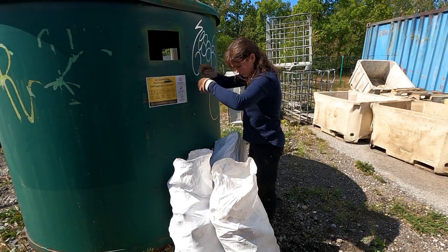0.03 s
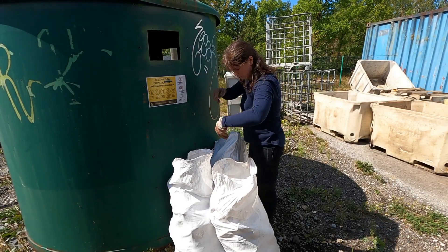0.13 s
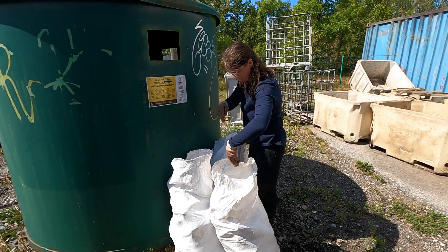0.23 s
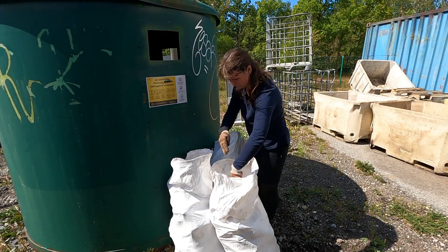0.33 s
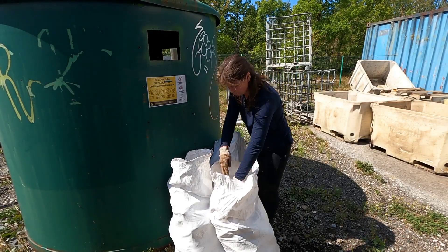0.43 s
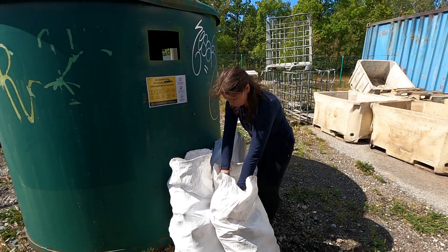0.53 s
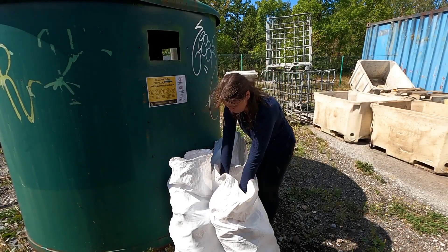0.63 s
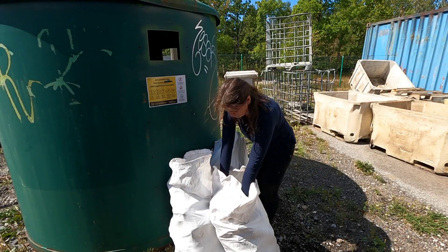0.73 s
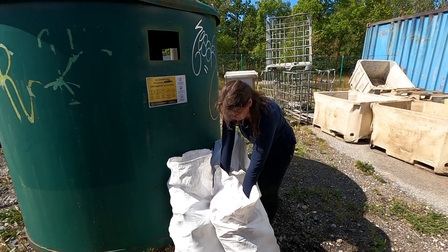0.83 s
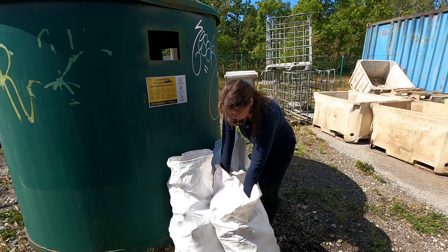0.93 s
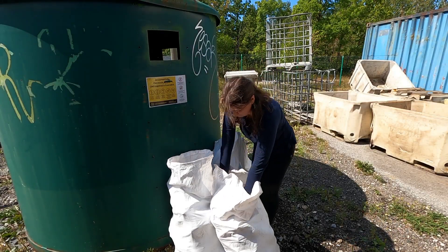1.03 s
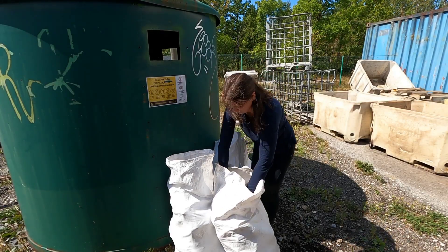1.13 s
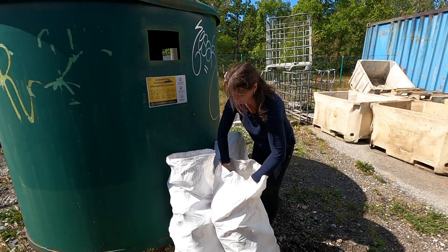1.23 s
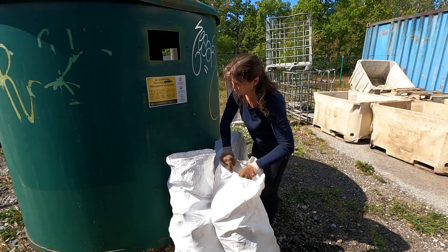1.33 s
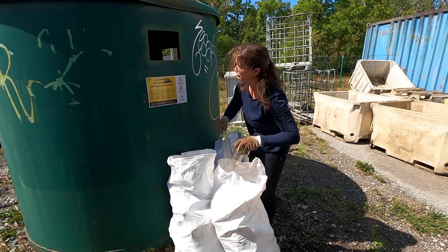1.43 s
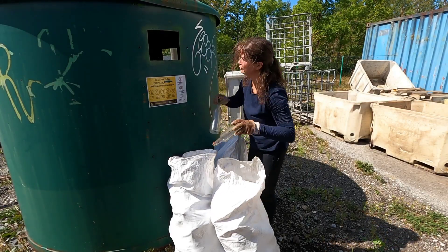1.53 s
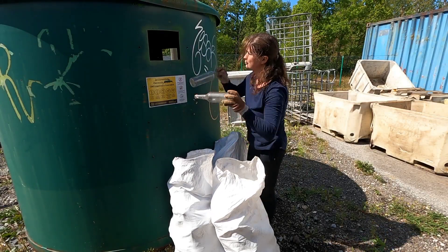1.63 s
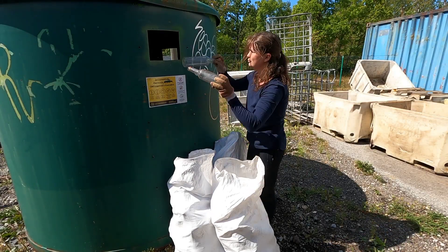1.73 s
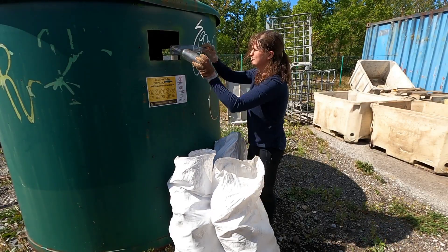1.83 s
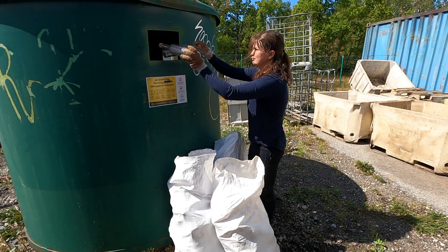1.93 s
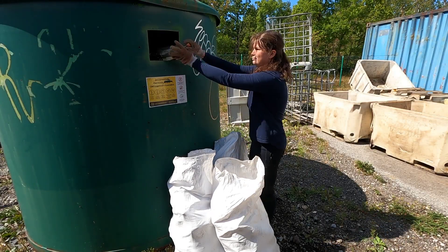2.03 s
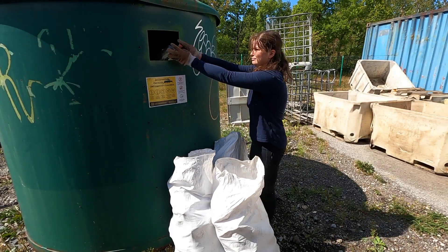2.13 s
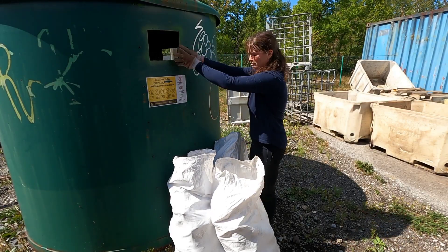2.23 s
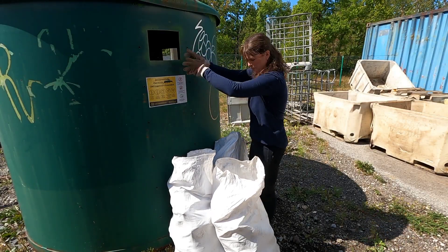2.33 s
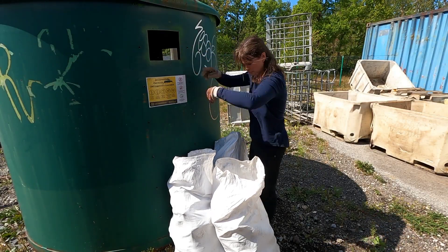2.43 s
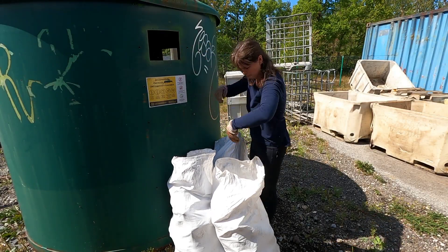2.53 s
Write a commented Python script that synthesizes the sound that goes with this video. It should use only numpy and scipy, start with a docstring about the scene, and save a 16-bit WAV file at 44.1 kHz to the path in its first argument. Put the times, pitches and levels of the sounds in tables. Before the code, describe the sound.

A glass piece shatters on a heap in a booming container, then bottles scrape, clink and bounce

```python
"""Waste glass goes into a big hollow recycling bank, outdoors in a light breeze (filtered noise).
First a piece smashes on the heap with a low knock (a push and a noise burst): shards tumble in waves
(randomly struck resonators and grains), larger pieces ring (decaying sines with jostling noise) and the
shell booms (decaying low noise). Then bottles scrape and clink in the hands (noise chirps, beating modes,
a diffuse echo), drop in and bounce without breaking; faint steps on gravel tick (pushes and bursts)."""
import sys
import numpy as np
from scipy import signal
from scipy.fft import rfft, irfft
from scipy.io import wavfile

SR = 44100
rng = np.random.default_rng(int(sys.argv[2]) if len(sys.argv) > 2 else 0)


def unload_audio(sound):
    """Save the sound as a 16-bit wav file, at the path given as the first command line argument."""
    columns = np.transpose(np.atleast_2d(sound))
    # keep every value between -1 and 1, then stretch to whole-number steps
    steps = np.round(np.clip(columns, -1, 1) * 32767)
    wavfile.write(sys.argv[1], SR, steps.astype(np.int16))


N = 112455
T = np.arange(int(1.2 * SR)) / SR  # time within one event, s
HZ = np.fft.rfftfreq(len(T), 1 / SR)

# spectrum of breaking and touching glass: f/Hz, level/dB
GLASS_TONE = [(300, -39), (900, 4), (1400, 0), (2000, -0.5), (2350, -2.5), (3600, 0), (5600, -5),
              (6800, -2), (8200, -8), (9600, -11), (10800, -17.5), (12200, -17.5), (16000, -44)]


def amp(db):
    """Level to amplitude: 20 dB is a factor of ten."""
    return 10 ** (np.asarray(db) / 20)


def evened(x):
    """Normalization of power: scales to rms 1."""
    return x / np.sqrt(np.mean(x ** 2) + 1e-20)


def read(points, hz):
    """Pitch is logarithmic in frequency: interpolates a table on that axis."""
    f, value = np.transpose(points)
    return np.interp(np.log(hz + 1), np.log(f + 1), value)


def fade(t60):
    """Exponential decay: linear damping loses 60 dB in every t60 seconds."""
    return np.exp(-np.log(1000) * T / t60)


def add(mix, s, sound):
    """Superposition: adds a stereo sound at time s, cut at the ends of the scene."""
    at = round(s * SR)
    sound = sound[:, max(-at, 0):]
    part = mix[:, max(at, 0):][:, :sound.shape[1]]
    part += sound[:, :part.shape[1]]


def paired(x, db):
    """Interchannel coherence: colours two unrelated signals and makes them partly alike."""
    # likeness of left and right: f/Hz, coherence/1
    coherence = [(30, 0.63), (100, 1), (500, 0.99), (1000, 0.76), (2000, 0.54), (4000, 0.74)]
    hz = np.fft.rfftfreq(x.shape[1], 1 / SR)
    same = np.clip(read(coherence, hz), -1, 1)
    left, other = rfft(x)
    right = same * left + np.sqrt(1 - same ** 2) * other
    return evened(irfft(np.array([left, right]) * amp(db), x.shape[1]))


def hiss(db, size=len(T)):
    """Spectral shaping: stereo Gaussian noise filtered to a given spectrum, rms 1."""
    return paired(rng.standard_normal((2, size)), db)


def dying(db, t60s):
    """Frequency-dependent damping: stereo noise whose bands each decay at their own rate."""
    hz, t, bands = signal.stft(hiss(db), SR, nperseg=512)
    decay = amp(-60 * t / read(t60s, hz)[:, None])
    return signal.istft(bands * decay, SR, nperseg=512)[1][:, :len(T)]


def ring(hz, t60):
    """Lifted degeneracy: glass is never quite round, so a mode beats with a weaker twin."""
    twin, split_hz = 0.42, 30  # relative amplitude, largest split
    ear_phase = 0.22 * rng.uniform(-2.8, 1) * np.array([[1], [-1]])  # rad, opposite at the two microphones
    phase = 2 * np.pi * hz * T + ear_phase
    offset_hz = split_hz * rng.uniform(0.86, 1) * rng.choice([-1, 1])
    twin_phase = phase + 2 * np.pi * (offset_hz * T + rng.random())
    onset = 1 - np.exp(-(T / 0.00096) ** 2)
    return np.sqrt(2) * (np.sin(phase) + twin * np.sin(twin_phase)) * fade(t60) * onset


def echo(x):
    """Diffuse reverberation: convolution with dense decaying reflections inside the bank."""
    # decay of the reflections: f/Hz, t60/s
    echo_t60 = [(2500, 0.46), (5000, 0.43), (12000, 0.21)]
    tail = dying(0 * HZ, echo_t60)
    return signal.fftconvolve(x, tail / np.linalg.norm(tail[0]), axes=1)[:, :len(T)]


def burst(db, hz, t60, width=0.061, slope_db=25):
    """Heavy damping broadens a resonance: noise around one pitch (width in octaves, slope in dB/octave)."""
    contact_s = 0.001
    shape = fade(t60) * (1 - np.exp(-(T / contact_s) ** 2))  # the contact builds up smoothly
    distance = np.hypot(np.log2((HZ + 20) / hz), width)
    rattle = hiss(-slope_db * distance) * shape
    return amp(db) * evened(rattle) * np.sqrt(np.mean(shape ** 2))


def tumble(db, rise, t60, treble_db):
    """Random impact excitation: shards chatter at their own pitches over a crunch of tiny fractures."""
    # pitches of the broken glass lying in the heap: f/Hz
    heap = [2270, 2476, 2573, 2842, 2920, 3101, 3246, 3413, 3810, 4010, 4290, 4420, 4560, 4690, 4845, 5378,
            5510, 5787, 6060, 6412, 7260, 7612, 7865, 8231, 9450, 11900, 12400]
    detune, shard_t60, hits_per_s = .022, 0.11, 55  # fraction of pitch, s, rate for each shard
    crunch_db, size_db, grains_per_s = 0.5, 3.5, 3500
    size = 32768
    t, hz = T[:size], np.fft.rfftfreq(size, 1 / SR)
    radius = np.exp(-np.log(1000) / (shard_t60 * SR))  # pole radius that gives the decay
    tinkle = np.zeros((2, size))
    for pitch in np.repeat(heap, 2) * (1 + detune * rng.uniform(-1.04, 1, 2 * len(heap))):
        hits = (rng.random(size) < hits_per_s / SR) * 1.
        hits[0] = 2
        hits *= rng.standard_normal(size)
        turn = 2 * np.pi * pitch / SR
        poles = [1, -2 * radius * np.cos(turn), radius * radius]
        shard = evened(signal.lfilter([1, 0, -1], poles, hits))
        tinkle += rng.standard_normal((2, 1)) * shard  # random weight and sign in each channel
    grain_size = amp(size_db * np.minimum(rng.exponential(1, size), 4))
    grains = grain_size * (rng.random(size) < grains_per_s / SR) * rng.standard_normal((2, size))
    tone = read(GLASS_TONE, hz) + treble_db * np.log2(np.clip(hz, 1500, 9000) / 4000)
    glass = paired(evened(tinkle) + amp(crunch_db) * evened(grains), tone)
    return amp(db) * glass * np.minimum(t / rise, 1) * fade(t60)[:size]


def piece(hz, db, t60, width_hz=50):
    """Modal ringing: a large piece sounds its mode, with noise around it as neighbours jostle it."""
    rattle = .6
    jostle = hiss(-20 * np.log10(1 + ((HZ - hz) / width_hz) ** 2))
    return amp(db) * np.minimum(T / 0.0014, 1) * (ring(hz, t60) + rattle * jostle * fade(t60))


def boom(db, bass_db, rise, bass_hz=450):
    """High modal density: the shell and its air ring in a crowd of low modes."""
    # spectrum of the boom: f/Hz, level/dB
    boom_tone = [(40, -37), (70, -10), (100, -6), (140, -4.5), (220, -0.5), (300, -4.5), (410, -1.5),
                 (520, -0.5), (660, -1.5), (850, -1), (1150, -3), (1450, -11), (2000, -25.5), (4000, -16),
                 (9000, -89)]
    # decay of the boom: f/Hz, t60/s
    boom_t60 = [(80, 0.88), (200, 0.73), (500, 1), (1000, .85), (2000, 0.59), (6000, 0.13)]
    # panel modes of the shell that stand out: f/Hz, lift/dB before neighbouring peaks add
    panel_modes = [(106, 4.5), (135, 10), (232, 2.5), (363, 4), (423, 11), (824, 7.5), (1160, -1.5)]
    half_width_hz = 7.3
    panels = sum(gain / (1 + ((HZ - f) / half_width_hz) ** 2) for f, gain in panel_modes)
    bass = bass_db * np.log2(np.maximum(bass_hz / np.maximum(HZ, 70), 1))
    tail = dying(read(boom_tone, HZ) + panels + bass, boom_t60)
    return amp(db) * np.minimum(T / rise, 1) * tail


def clink(bottle, db, length, treble_db, echo_db, free_s, tick_db=-9, scatter_db=7):
    """Modal superposition: a bottle rings until grip or landing damps it; the bank echoes it."""
    # modes of each bottle, by name: f/Hz, level/dB, t60/s (before strike level, tilt and ring length)
    bottles = { "long": [(2536, -16, 1.1), (2584, -12, .85), (3537, -2, .24), (3628, 0, .2),
               (3332, -15, .15), (4958, -31, .18), (7176, -18, .16), (7290, -22, .16), (11710, -38, .14)],
               "bright": [(2519, -8, .2), (2588, -9, .3), (3354, 0, .16), (3688, -12, .15),
               (3935, -13, .12), (4958, -3, .24), (6142, -8, .16), (6272, -6, .18), (7214, -17, .17),
               (8145, -18, .14), (9555, -20, .14)], "short": [(2401, -10, .09), (2530, -13, .35),
               (2577, -9, .42), (3424, 0, .11), (4150, -14, .06), (6115, -14, .17), (6331, -15, .15)],
               "deep": [(2514, -3, .25), (2573, -2, .33), (3365, -3, .15), (3505, -4, .2), (3591, -7, .2),
               (4780, -9, .15), (4974, -10, .27), (5954, -15, .16), (6228, -12, .15), (7375, -15, .16)], }
    grip_s, grip_db = 0.019, -14.5
    sound = 0
    for hz, mode_db, t60 in bottles[bottle]:
        level = db + mode_db + treble_db * np.log2(hz / 3500)
        sound = sound + amp(level) * ring(hz, t60 * length)
    sound = sound * amp(grip_db * np.clip((T - free_s) / grip_s, 0, 1))
    tick_tone = read(GLASS_TONE, HZ) + treble_db * np.log2(np.maximum(HZ / 5000, 1))
    tick = amp(db + tick_db) * hiss(tick_tone)
    reflected = echo(sound) + amp(scatter_db) * tick * fade(0.23)
    return sound + tick * fade(0.017) + amp(echo_db) * reflected


def knock(db, hz, t60):
    """Impulsive contact force: a dry knock or tick is a push alike at both microphones and a rattle."""
    push_cycles, push_db = 1.84, -2
    window = np.sin(np.pi * np.minimum(T * hz / push_cycles, 1)) ** 2
    push = np.sin(2 * np.pi * hz * T) * window
    return amp(db + push_db) * push + burst(db, hz, t60)


def slip(db, hz):
    """Stick-slip friction: one release of glass on glass gives a chirp and a dull body."""
    t60, body_hz, body_db = 0.028, 1110, -2
    chirp = burst(db, hz, t60, width=0.18, slope_db=48)
    return chirp + burst(db + body_db, body_hz, t60, width=0.45, slope_db=15)


def outdoors():
    """Turbulent pressure noise: breeze puffs on the microphone over a steady open-air hush."""
    # spectrum of the breeze: f/Hz, level/dB
    wind_tone = [(20, -4.5), (35, 3), (60, -7), (120, -15), (200, -22), (400, -39), (1500, -77)]
    # spectrum of the hush: f/Hz, level/dB
    air_tone = [(30, 4.5), (170, -3.5), (430, -4.5), (750, -13.5), (1500, -10.5), (2200, -18.5),
                (4000, -21.5), (7000, -25.5), (10000, -41), (12500, -40), (16000, -62)]
    # Gaussian puffs of breeze: t/s, level/dB, half length/s (to 1/e)
    puffs = [(0.097, -41.5, 0.14), (0.6, -41.5, 0.1), (0.774, -24, 0.022), (1.09, -41.5, 0.1),
             (1.49, -40, 0.012), (1.622, -35, 0.094), (2.537, -42, 0.081)]
    breeze_db, air_db = -54, -51
    hz, t = np.fft.rfftfreq(N, 1 / SR), np.arange(N) / SR
    gusts = amp(breeze_db) + sum(amp(db) * np.exp(-((t - s) / half) ** 2) for s, db, half in puffs)
    breeze = gusts * hiss(read(wind_tone, hz), size=N)
    return breeze + amp(air_db) * hiss(read(air_tone, hz), size=N)


def scene():
    """Linear superposition: every event is added to the outdoor air."""
    # blows that set the bank booming: t/s, level/dB, bass lift/(dB/octave downward), rise/s
    thuds = [(-.1, -24.5, 0.5, .005), (.2, -18.5, 3.5, 0.00088), (.53, -30, 1.5, 0.022),
             (.611, -23, 3.5, 0.0017), (.642, -41, -19, 0.0033), (.869, -31, -3, 0.007),
             (1.07, -33.5, 1, 0.0039), (1.212, -33.5, -0.5, 0.0011), (2.084, -23, -8, 0.0038),
             (2.117, -23, -1, 0.003), (2.173, -29, 2.5, 0.0014)]
    # waves of tumbling shards: t/s, level/dB, rise/s, t60/s, treble/(dB/octave)
    tumbles = [(.186, -22.5, 0.07, 1, 2.5), (.207, -19, 0.02, 1, -1.5), (.283, -30.5, 0.0015, 0.43, 2),
               (.343, -24.5, .004, 0.55, 2), (.368, -25, 0.0016, 0.33, 1.5), (.49, -29.5, 0.019, 1, 0),
               (.568, -22.5, 0.029, 1, 0), (.635, -21.5, .012, 0.52, -11), (.71, -27, 0.032, 0.82, 0),
               (.81, -26, 0.063, 0.55, 4.5), (.868, -29, 0.036, 0.87, 1.5), (.97, -39.5, 0.018, 1, -16),
               (1.055, -30, 0.038, 1, 0.5), (1.21, -31, 0.077, 0.67, -2), (1.305, -37.5, 0.027, 0.71, 5)]
    # larger pieces that ring out in the heap: t/s, f/Hz, level/dB, t60/s
    pieces = [(-.05, 2573, -56, 1), (-.05, 4850, -59, .8), (.214, 2295, -28, .42), (.216, 2584, -28, .5),
              (.214, 5432, -26, .28), (.21, 5620, -28, .15), (.24, 4900, -29, .25), (.285, 3830, -26, .22),
              (.343, 2573, -28, .4), (.343, 2449, -25, .22), (.353, 6072, -28, .28), (.438, 2560, -32, .35),
              (.488, 3284, -29, .32), (.49, 2530, -34, .35), (.57, 3870, -29, .25), (.576, 7607, -32, .22),
              (.572, 5378, -34, .5), (.585, 2250, -33, .55), (.61, 2575, -29, .5), (.645, 3240, -29, .45),
              (.66, 2825, -32, .5), (.825, 3260, -37, .25), (.88, 4420, -31, .35), (1.07, 2923, -38, .5),
              (1.075, 7224, -44, .25)]
    # bottle strikes: t/s, bottle, level/dB, ring length factor/1, treble/(dB/octave), bank echo/dB,
    # free time before the bottle is gripped or lands/s
    clinks = [(1.237, "long", -26.5, 0.5, -0.5, -26, .5), (1.253, "deep", -25, 0.35, 1, -24, .5),
              (1.365, "short", -24, 0.98, 3.5, -25, .5), (1.527, "long", -18, 0.85, 1, -16.5, .145),
              (1.764, "long", -55.5, 0.5, -13, 7, .5), (2.084, "bright", -35, 0.33, -2, -8, .5),
              (2.1165, "bright", -23.5, 0.6, 1, -5.5, .022), (2.172, "deep", -22.5, 0.63, 0, -8.5, .09)]
    # dry knocks and ticks (glass hits, a low knock in the smash, faint steps on gravel):
    # t/s, level/dB, f/Hz, t60/s
    knocks = [(.2003, -6.5, 890, 0.013), (.202, -18, 253, 0.13), (1.166, -23, 1290, 0.028),
              (1.2445, -17, 1310, 0.031), (1.254, -20, 1390, 0.035), (1.32, -36.5, 1270, 0.27),
              (1.3645, -25.5, 1540, 0.032), (1.5266, -14.5, 1198, 0.02), (1.529, -10.5, 2920, .012),
              (1.762, -44, 1600, 0.065), (2.452, -47, 4180, 0.073)]
    # slips as the bottles scrape together: t/s, level/dB, f/Hz
    slips = [(1.2135, -24, 4200), (1.221, -19, 4160), (1.2268, -17, 3840), (1.232, -20, 4260),
             (1.2345, -22.5, 4130), (1.245, -17.5, 3360)]
    left_db = 0.43  # the right channel is lowered by as much
    mix = outdoors()
    events = ((tumbles, tumble), (pieces, piece), (thuds, boom),
              (clinks, clink), (knocks, knock), (slips, slip))
    for table, source in events:
        for s, *row in table:
            add(mix, s, source(*row))
    return mix * amp([[left_db], [-left_db]])


def record(dry):
    """Band limitation: a linear-phase low-pass removes the highest treble."""
    edge_hz = 15900
    lowpass = signal.firwin(401, edge_hz, window=("kaiser", 9), fs=SR)
    return signal.oaconvolve(dry, lowpass[None], "same")


dry = scene()
out = record(dry)
unload_audio(out)
```